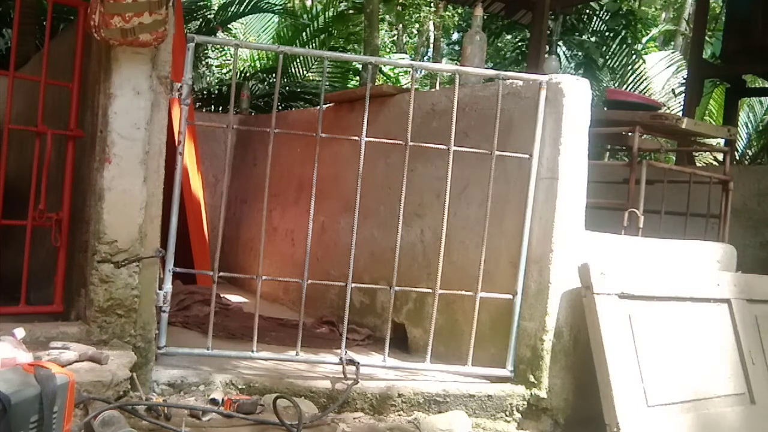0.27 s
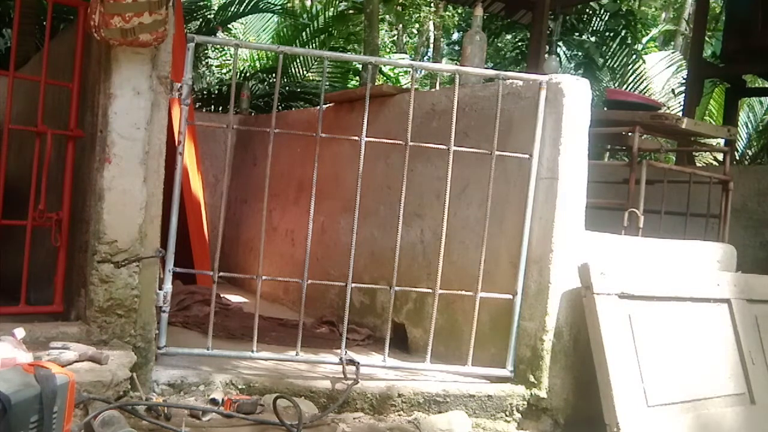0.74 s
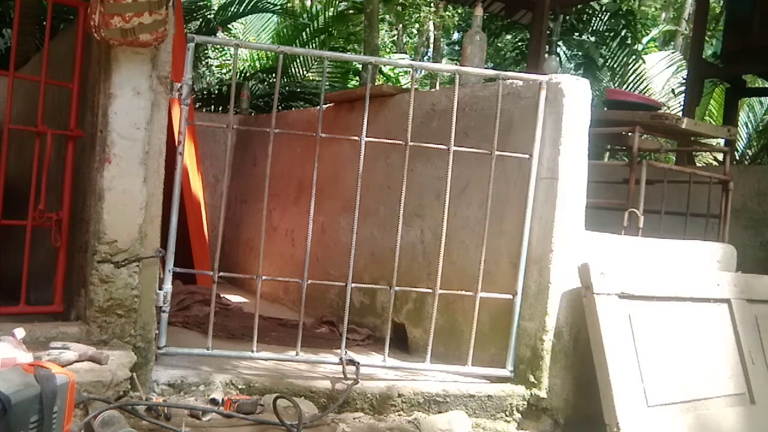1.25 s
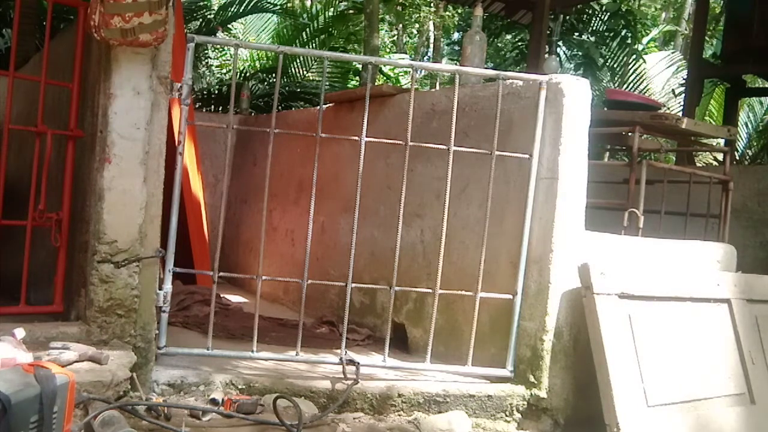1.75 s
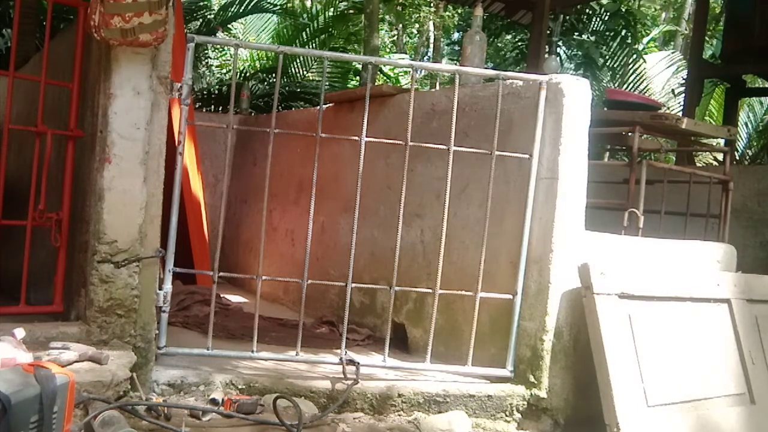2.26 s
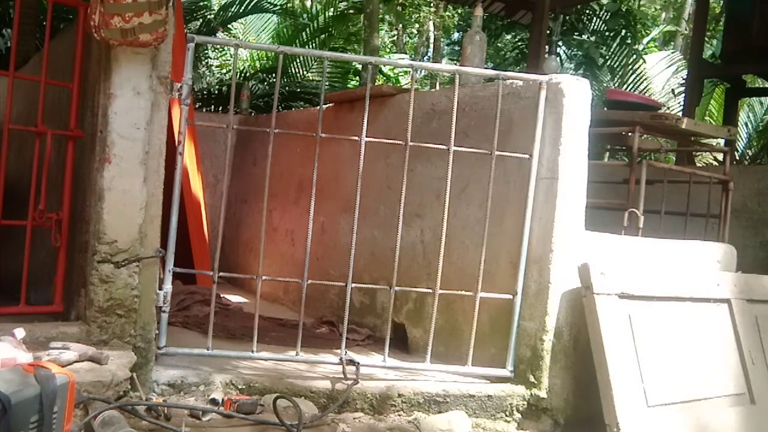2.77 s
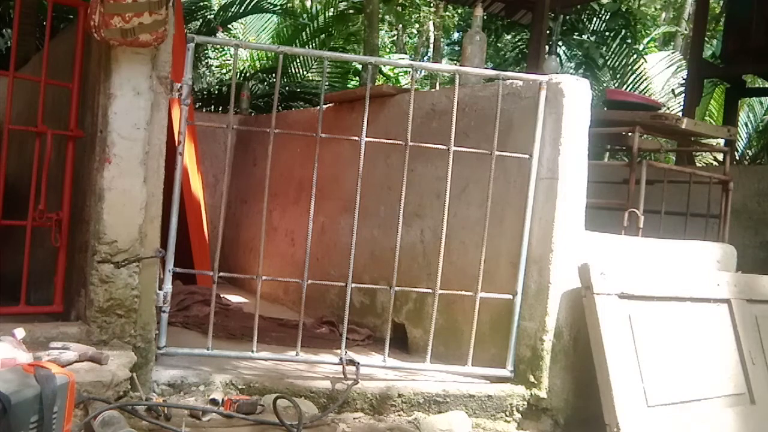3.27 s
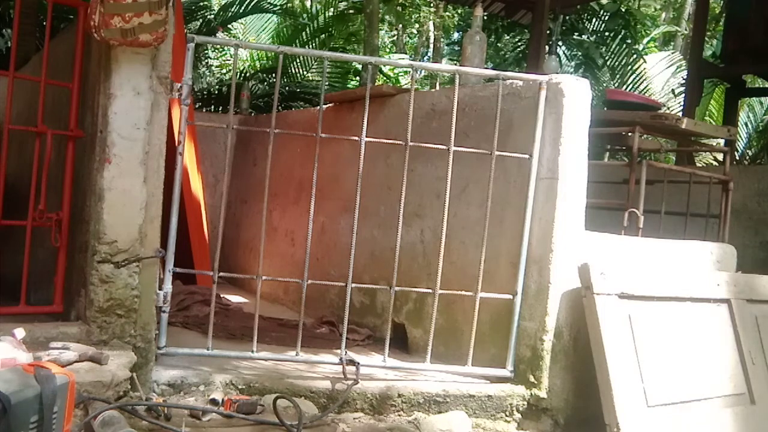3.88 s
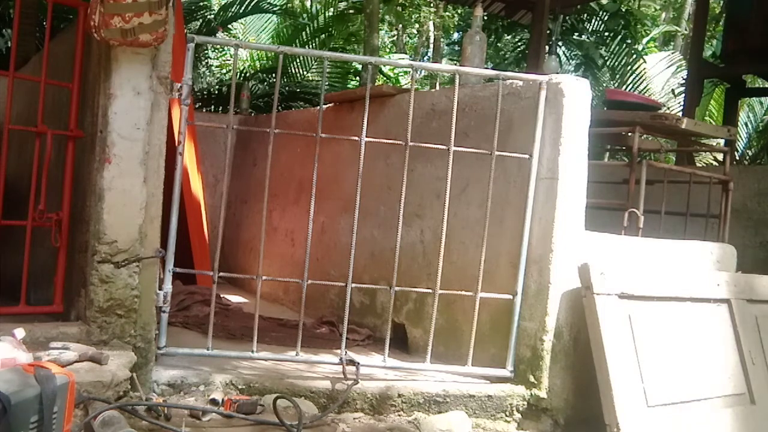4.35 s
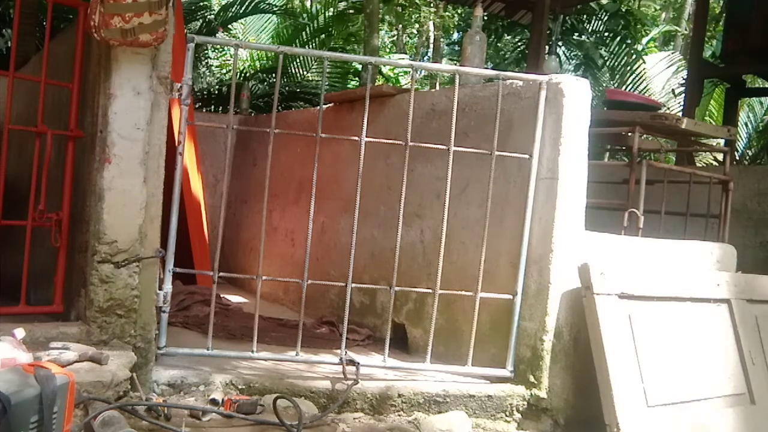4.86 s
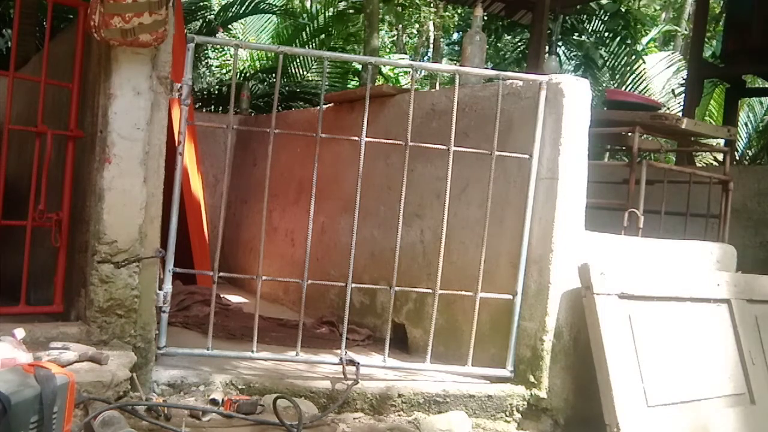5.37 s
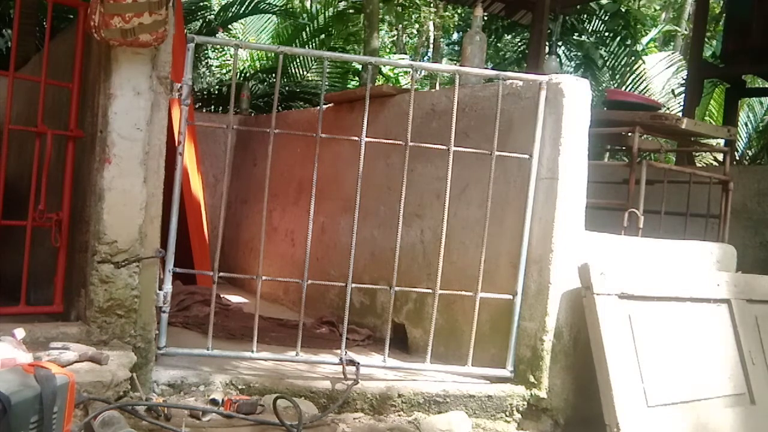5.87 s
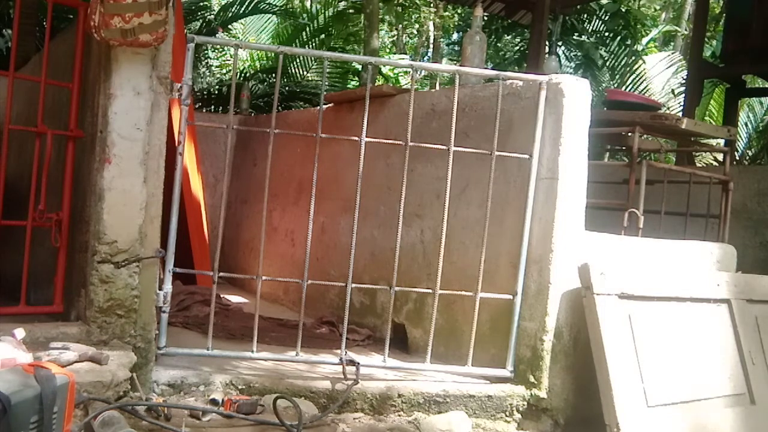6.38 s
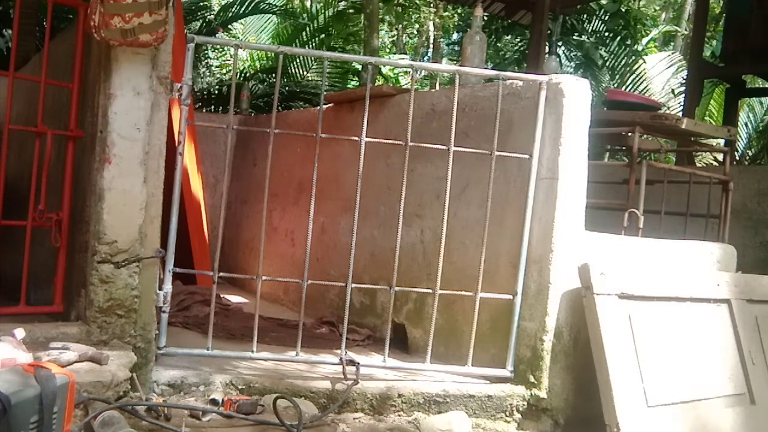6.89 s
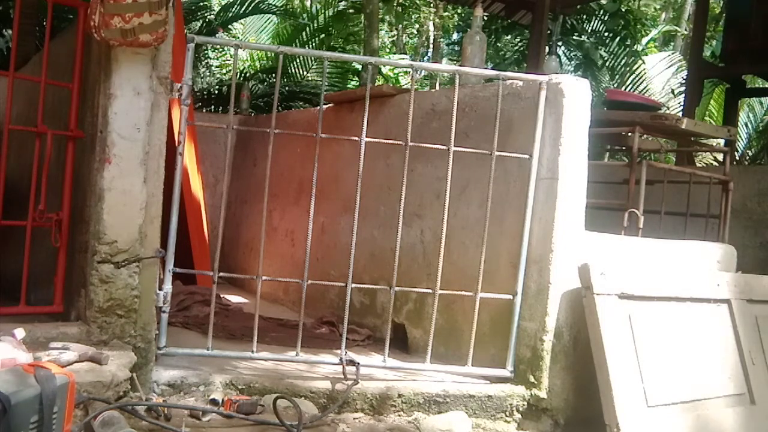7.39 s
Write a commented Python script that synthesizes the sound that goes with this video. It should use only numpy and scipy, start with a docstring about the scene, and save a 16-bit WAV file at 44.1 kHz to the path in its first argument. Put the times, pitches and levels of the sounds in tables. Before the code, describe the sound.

A clear pig squeal gives way to snorting grunts, hoarse barks, low whines and shrill ragged screams ringing off pen walls.

```python
"""Hungry pigs call over one another in an open concrete pen, heard from outside the gate.
A clear squeal opens over the quiet yard, then a second slides down; vocal folds give partials, chaos smears them.
A grunter flaps slack folds and snorts; low whines and hoarse barks of noise join, then shrill harmonic screams.
Rough, wavering squeals follow in the second half, and near the end a bird glides up in one whistle.
The walls add a short ring by convolution throughout; both channels are the same."""
import sys
import numpy as np
from scipy import signal
from scipy.fft import rfft, irfft, next_fast_len
from scipy.io import wavfile
from scipy.ndimage import uniform_filter1d

SR = 44100
rng = np.random.default_rng(int(sys.argv[2]) if len(sys.argv) > 2 else 0)


def unload_audio(sound):
    """Save the sound as a 16-bit wav file, at the path given as the first command line argument."""
    columns = np.transpose(np.atleast_2d(sound))
    # keep every value between -1 and 1, then stretch to whole-number steps
    steps = np.round(np.clip(columns, -1, 1) * 32767)
    wavfile.write(sys.argv[1], SR, steps.astype(np.int16))


N = 336483  # samples

# Levels in the tables are relative: voice trims, the pen and the master gain act on them afterwards.
# quiet air of the yard, with a faint band near 7.6 kHz, probably insects; spectrum: frequency_hz, relative_db
YARD_COLOUR = [(25, -27), (42, -19), (60, 11), (120, 7.5), (250, 2), (600, -6.5), (1500, -18),
               (3500, -16.5), (6000, -10), (6700, -27), (7600, -2), (9000, -20.5), (13000, -44),
               (15200, -18)]
YARD_DB, YARD_WAVER_DB = -59.5, 0.4

# bird whistle: a glide that levels off
BIRD_START_S, BIRD_LENGTH_S, BIRD_RISE_S, BIRD_DB = 7.235, 0.12, 0.071, -30.5
BIRD_FROM_HZ, BIRD_TO_HZ, BIRD_GLIDE_S = 3670, 6700, 0.068

# low whines: start_s, length_s, pitch_hz, fundamental_db (before the throat), overtones_db (over that level)
WHINES = [(0.954, 0.15, 400, -46, -18), (1.301, 0.29, 590.4, -45.5, 0), (2.281, 0.1, 379, -47.5, -21),
          (2.307, 0.062, 644, -41, -5), (2.414, 0.13, 622, -44.5, -2.5), (2.421, 0.14, 342, -65.5, 8),
          (2.614, .14, 371.5, -55, -3), (2.729, .14, 342.3, -59.5, -0.5), (4.203, 0.22, 288.5, -62.5, 4.5),
          (4.419, 0.14, 300.4, -58, 5), (4.799, 0.13, 302.5, -61.5, 10.5), (5.365, 0.17, 303, -53, 3.5),
          (5.523, 0.127, 291, -50.5, -4.5), (5.67, 0.081, 377, -54.5, 2), (5.82, 0.16, 334, -53.5, -2),
          (6.062, 0.11, 287.4, -59.5, 1), (6.43, 0.27, 570, -48.5, 5), (6.929, 0.14, 349.3, -58, 10),
          (7.309, 0.084, 394.5, -47.5, -10)]
# throat colour of a whine: frequency_hz, gain_db
WHINE_THROAT = [(320, 9), (650, -3), (900, 3), (1200, 13.5), (1550, -1), (2100, 0.5), (3200, -3.5),
                (6000, -8.5), (9000, -38)]
WHINE_SAG, WHINE_ARCH = 0.025, 0.0199  # pitch falls and bulges by these shares

# grunts: first_flap_s, rise_s, length_s, chest_db, swell_db (up to the peak),
# mouth_db (over the chest level), flap_rate_hz, belly_db (lift of the lowest chest resonance)
GRUNTS = [(0.365, 0.052, 0.11, -41.5, 2, 8, 32, -1), (0.481, 0.26, 0.27, -33.5, 2, 0, 39, 11),
          (0.997, 0.054, 0.11, -44, -3, -3, 28, 5), (1.697, 0.14, 0.28, -32.5, 10, -2, 27, 6),
          (2.854, 0.16, 0.16, -36.5, 2.5, -12, 33.3, 0), (2.974, 0.042, 0.17, -28, 8, -1.5, 30, 1.5),
          (3.928, 0.12, 0.27, -30, 7, -4.5, 37, 0), (5.063, 0.14, .26, -28.5, 11.5, -1.5, 36, 1.5),
          (6.37, 0.03, 0.15, -34.5, 6, 4, 25.3, 5), (6.724, 0.044, 0.13, -35, -9, -6, 24, -5),
          (7.532, 0.13, .12, -28, 23.5, 0, 34.4, -3)]
# chest resonances of the grunting pig and its corner: frequency_hz, width_hz, gain_db
CHEST_MODES = [(63, 21, 2.5), (141.5, 39, 6), (179, 24, 6.5), (247, 19.7, 12), (386.3, 24, 7.5),
               (549, 98, 5), (647, 42, -17)]
# mouth resonances of the grunting pig: frequency_hz, width_hz, gain_db
MOUTH_MODES = [(979.5, 53, 13.5), (1140, 446, 4), (1494, 480, 0), (2620, 3100, -13), (5200, 3600, -21)]
GRUNT_DROP_DB, GRUNT_RELEASE_S = 5, .035  # fall from peak to end; final linear fade
FLAP_S, FLAP_LEAK, FLAP_UNEVEN_DB = .009, .15, 2.5  # puff decay, steady leak of air, level unevenness
FLAP_SNAP = 4  # height of the snap against the puff

# hard single flaps: start_s, level_db, decay_s, nose_hiss_db (over the level)
SNORTS = [(.512, -29.5, 0.01, -20), (0.605, -26, 0.023, -10), (0.668, -23, 0.011, -10),
          (1.082, -36, 0.012, -24), (1.242, -36, 0.0079, -14), (1.767, -22, 0.0075, -25),
          (2.976, -24, 0.027, -13), (3.919, -30.5, 0.017, -26), (4.034, -27, 0.012, -1)]
# body resonances of a snort: frequency_hz, width_hz, gain_db
SNORT_MODES = [(132, 210, -5), (243, 70, 0.5), (399, 41, 4.5), (546, 54, 3), (1010, 200, -4)]
NOSE_HZ, NOSE_WIDTH_HZ = 2390, 500

# barks that open calls: start_s, rise_s, length_s, level_db, hiss_db (over the level), gape (0-1), opening_s
BARKS = [(0.967, 0.05, 0.11, -32, -5.5, 0.4, 0.06), (1.219, 0.052, 0.074, -28.5, -7.5, 0.18, 0.1),
         (2.177, .11, 0.15, -34.5, 0.5, 0.11, 0.1), (2.937, 0.48, 0.086, -33, 2, 0.48, 0.11),
         (3.945, 0.13, 0.46, -40, 9, 0.22, 0.16), (4.483, 0.017, 0.085, -40, 8.5, 0.06, 0.12),
         (4.671, 0.098, 0.27, -26, -3.5, 1, .125), (6.302, 0.1, 0.16, -27.5, -11.5, 0.85, 0.079),
         (7.284, 0.092, 0.15, -37.5, 2.5, 0.1, 0.06)]
# lower throat resonances of a bark: jaw_shut_hz, jaw_open_hz, width_hz, gain_db
BARK_LOW_MODES = [(509, 1150, 210, 9.5), (1218, 1650, 196, 15.5)]
# upper throat resonances of a bark: jaw_shut_hz, jaw_open_hz, width_hz, gain_db
BARK_HIGH_MODES = [(2823, 3600, 570, 3.5), (3820, 4500, 95, -5.5), (4740, 3000, 340, -2.5),
                   (5780, 5800, 470, 4.5)]
BARK_SWELL_DB, BARK_DROP_DB = 13, 30  # up to the peak, down to the end

# In the loud cries, bite is the band 2-5 kHz over the band below it; edge is the band above 5 kHz.
# clear opening squeal: time_s, pitch_hz, level_db, bite_db
CLEAR_SQUEAL = [(0.0, 461.7, -22, 0), (.07, 506, -22.5, -3), (.115, 518.2, -27, 0), (.16, 517.3, -15, -11),
                (.225, 529.2, -27, 2), (.29, 532.2, -22, -1), (.345, 535.8, -31, 3), (.395, 532.6, -30, 3),
                (.45, 531, -35, -1.5), (.51, 533, -40, -6), (.63, 536, -60, -7)]
# a second pig's squeal, sliding down as the first ends: time_s, pitch_hz, level_db, bite_db
FALLING_SQUEAL = [(.345, 543, -47, 0), (0.389, 523.3, -28.5, -4), (.44, 481, -27.5, -8),
                  (.49, 457, -38, -2)]
# folds lock on the pitch, then break up: lock_s, break_s, locked_roughness (0-1), loose_roughness (0-1),
# edge_db (over the bite)
CLEAR_LOCK = (.12, .37, .035, .3, -19)
# throat colour of the clear squeals: frequency_hz, gain_db
CLEAR_THROAT = [(300, -20), (480, -2), (560, -11.5), (1040, 15.5), (1600, 2.5), (1950, -6.5), (2150, -11.5),
                (2650, -28.5), (3180, -10), (3750, -16), (4200, -29), (4800, -29), (5300, -24.5),
                (5800, -24), (7400, -22), (9000, -43.5), (11500, -49), (14000, -59)]

# short squeals: start_s, length_s, first_pitch_hz, last_pitch_hz, level_db, swell_db, bite_db,
# edge_db (over the level), brightening_db (along the call), mouth_hz, settled_roughness (0-1)
SHORT_SQUEALS = [ (4.446, 0.11, 617, 579.5, -39.5, 12, 7, 9, -12, 2500, 0.44),
                 (4.736, .2, 606, 605.4, -29.5, -7, 10, 13.5, -15, 3300, 0.49),
                 (5.142, .22, 565, 694, -37, 7, 3, -2.5, -2, 3550, 0.74), ]
# long wavering squeals, one list each: time_s, pitch_hz, level_db, bite_db
LONG_SQUEALS = [
    [(4.01, 696, -47, 5), (4.055, 714, -47, 14.5), (4.14, 755, -41, 7), (4.26, 755, -43, 1),
     (4.31, 704, -43.5, -5), (4.38, 701, -44, -12), (4.47, 711, -53.5, 17), (4.52, 686, -44, -6),
     (4.57, 690, -48, -9)],
    [(5.34, 687, -41, 1), (5.39, 768, -41.5, 8), (5.54, 693, -44.5, 9.5), (5.63, 710.4, -33.5, 0),
     (5.708, 646.4, -28, -3), (5.77, 681.7, -37.5, 1), (5.85, 679.6, -28, -1.5), (5.964, 713, -26.5, -9),
     (6.015, 698, -37.5, -2.5), (6.04, 720, -57, 4)],
]
# folds of each long squeal: lock_s, break_s, locked_roughness (0-1), loose_roughness (0-1)
LONG_LOCKS = [(4.14, 4.49, .26, .7), (5.39, 6.0, .42, .75)]
# mouth of each long squeal: edge_db (over the bite), resonance_hz, width_hz, gain_db
LONG_MOUTHS = [(3.5, 3130, 450, 5), (-1.5, 4430, 320, -2)]
# throat colour of the short and long squeals: frequency_hz, gain_db
SQUEAL_THROAT = [(250, -15.5), (450, 15.5), (720, -35), (950, 8.5), (1200, 18), (1420, 16), (1650, 6.5),
                 (2050, -2.5), (2600, -8), (3300, -6), (3900, -14), (4600, -1.5), (5400, -11), (6300, -5),
                 (7700, -8), (9000, -19), (11500, -35), (15000, -36)]
SQUEAL_ATTACK_S, SQUEAL_RELEASE_S, SQUEAL_FOOT_DB = 0.048, 0.037, -13  # rises from and falls to this foot
SQUEAL_ARCH, SETTLE_S = .02, 0.0734  # pitch bulges by this share; the opening chaos dies away

# screams in the top register, one list each: time_s, pitch_hz, level_db, bite_db
SCREAMS = [
    [(1.255, 1293, -28, -14), (1.295, 1289, -21, -22.5), (1.32, 1275, -32, -11), (1.36, 1251, -27, -13),
     (1.424, 1415, -41.5, -7), (1.494, 1548, -37, 4.5), (1.576, 1339, -27, -1), (1.68, 1184, -37.5, -3.5),
     (1.794, 1490, -54.5, 15), (1.86, 1444, -27, -14.5)],
    [(2.24, 1029, -40.5, 8.5), (2.3, 1112, -31.5, 12.5), (2.345, 1112, -39.5, 14), (2.394, 1070, -49.5, 13),
     (2.478, 1139, -47, 20), (2.55, 1056, -42.5, 12.5), (2.69, 1021, -42.5, 6), (2.76, 1037, -68, 1)],
    [(2.99, 1127, -39.5, 1), (3.06, 1398, -40.5, 14.5), (3.115, 1266, -45, 10), (3.19, 1319, -40, 10),
     (3.23, 1245, -36, 5), (3.295, 1375, -33.5, 7.5), (3.335, 1244, -32.5, 6.5), (3.38, 1227, -26, -0.5),
     (3.45, 1264, -21.5, -2), (3.51, 1179, -25, -7.5), (3.555, 1178, -31.5, -0.5), (3.6, 1317, -34, 3.5),
     (3.64, 1278, -46.5, 7)],
    [(5.35, 1052, -52, 4), (5.41, 1026, -51, 14), (5.5, 970, -48.5, 18), (5.59, 1036, -50.5, 15.5),
     (5.7, 938, -47, 11.5), (5.84, 906, -46, 10.5), (5.94, 1013, -50.5, 17), (6.02, 982, -43.5, 13.5)],
    [(6.34, 1282, -47.5, 14), (6.385, 1390, -26.5, -0.5), (6.426, 1450, -32, 1.5), (6.462, 1615, -36, 4.5),
     (6.524, 1326, -33, -1.5), (6.62, 1307, -24, -5.5), (6.665, 1228, -23.5, -9), (6.73, 1218, -24, -7),
     (6.8, 1263, -22.5, -10), (6.92, 1253, -20, -9.5), (7.014, 1180, -20, -7), (7.055, 1130, -32.5, -5)],
    [(7.35, 967, -53, 2), (7.385, 1021, -28, 1), (7.43, 1146, -37, 8.5), (7.47, 1294, -29.5, 0),
     (7.55, 1263, -31.5, -1), (7.63, 1307, -25.5, -6.5)],
]
# folds of each scream: lock_s, break_s, locked_roughness (0-1), loose_roughness (0-1), period_doubling_db
SCREAM_LOCKS = [(1.47, 1.72, .34, .56, -7), (2.32, 2.55, .43, .78, -6), (3.34, 3.56, .36, .56, -12),
                (5.38, 6.0, .42, .7, -9), (6.51, 7.03, .31, .68, -11), (7.44, 7.7, .38, .62, -8)]
# mouth of each scream: edge_db (over the bite), resonance_hz, width_hz, gain_db
SCREAM_MOUTHS = [(-4.5, 2600, 350, -7), (-4.5, 3470, 450, 2), (-3.5, 2800, 330, 4.5), (-2.5, 3060, 450, 6),
                 (0, 4470, 550, -4), (0.5, 3900, 890, 1)]
# throat colour of a scream: frequency_hz, gain_db
SCREAM_THROAT = [(250, -14), (600, -4.5), (900, 4.5), (1280, 9.5), (1600, -0.5), (1950, -1.5),
                 (2300, -17.5), (2650, -13.5), (3800, -13), (4400, -13), (5000, -13), (6400, -7.5),
                 (7700, -8), (9000, -20.5), (11500, -37.5), (15000, -42.5)]

LOCK_S = .015  # time scale on which folds lock or break up
SMEAR_WIDENS_HZ = 4500  # above this, smeared partials grow wider
OPENING_S, OPENING_DB = 0.037, -14  # the treble of a cry comes in late, as the mouth opens
CUTOFF_HZ = 15550  # top of the partials and of the finished sound


def from_db(db):
    """Decibel law: a level becomes an amplitude gain."""
    return 10 ** (np.asarray(db) / 20)


def rms_one(x):
    """Normalisation: scale a signal to unit mean power."""
    return x / np.sqrt(np.mean(x ** 2) + 1e-20)


def gain_at(points, hz):
    """Spectral envelope: interpolate a colour in decibels over log frequency."""
    f, db = np.transpose(points)
    return from_db(np.interp(np.log(hz + 1), np.log(f), db))


def filtered(x, response):
    """Linear filtering: multiply the spectrum by a gain given as a function of frequency."""
    size = next_fast_len(len(x) + 2048)
    hz = np.arange(size // 2 + 1) * SR / size
    return irfft(rfft(x, size) * response(hz), size)[:len(x)]


def noise(size, colour):
    """Coloured noise: white noise through a spectral envelope, at unit power."""
    return rms_one(filtered(rng.standard_normal(size), lambda hz: gain_at(colour, hz)))


def drift(size, rate_hz):
    """Random modulation: low-passed noise wavering up to about the given rate, with unit power."""
    return rms_one(filtered(rng.standard_normal(size), lambda hz: 1 / (1 + (hz / rate_hz) ** 2)))


def evened(x, window=0.012):
    """Envelope flattening: hold the power over a window in seconds at 1."""
    power = np.abs(uniform_filter1d(x * x, int(window * SR)))
    return x / np.sqrt(power + 1e-12)


def resonate(x, modes):
    """Modal resonance: parallel two-pole resonators of alternating sign."""
    out = 0
    for k, (hz, width, db) in enumerate(modes):
        r = np.exp(-np.pi * width / SR)
        poles = [1, -2 * r * np.cos(2 * np.pi * hz / SR), r * r]
        ringing = signal.lfilter([1, 0, -1], poles, x)
        out = out + (-1) ** k * from_db(db) * (1 - r * r) / 2 * ringing
    return out


def hoarse(phase, width_hz):
    """Narrow-band noise: two random quadratures on a carrier phase, at unit power."""
    def spread():
        white = rng.standard_normal(len(phase))
        return filtered(white, lambda hz: 1 / np.sqrt(1 + (2 * hz / width_hz) ** 4))
    return rms_one(spread() * np.cos(phase) + spread() * np.sin(phase))


def span(start, length):
    """Time base: sample times of a call, and its progress from 0 to 1."""
    t = np.arange(int(start * SR), min(int((start + length) * SR), N)) / SR
    return t, (t - start) / length


def hump(t, rise_s, swell_db, drop_db):
    """Breath pressure: one push raises the level in dB to a rounded peak at 0, then it falls."""
    age = t - t[0]
    rise = np.maximum(1 - age / rise_s, 0)
    fall = np.maximum(age - rise_s, 0) / max(age[-1] - rise_s, .02)
    return -swell_db * rise ** 2 - drop_db * fall ** 2


def add(out, t, sound, fade_s=.008):
    """Superposition: lay a call into the track with linearly faded ends."""
    at = round(t[0] * SR)
    to_nearest_end = np.minimum(t - t[0], t[-1] - t)
    out[at:at + len(t)] += sound * np.minimum(1, to_nearest_end / fade_s)


def fold_phase(pitch, jitter, jitter_hz, waver):
    """Frequency modulation: phase of an oscillator whose pitch trembles quickly and wavers slowly."""
    size = len(pitch)
    trembling = jitter * drift(size, jitter_hz) + waver * drift(size, 25.46)
    return 2 * np.pi * np.cumsum(pitch * (1 + trembling)) / SR


def partials(phase, pitch, multiples, throat, chaos, smear_hz, flutter_db=4.5):
    """Source and filter: throat-weighted partials, smeared into bands by chaos, the high ones most."""
    out = 0
    for k in multiples[multiples * pitch.mean() < CUTOFF_HZ]:
        hz = k * pitch
        smeared = chaos * (hz / 3000) ** 1.3
        line = np.sqrt(2) * np.sin(k * phase + rng.uniform(0, 2 * np.pi))
        band = hoarse(k * phase, smear_hz * max(1, hz.mean() / SMEAR_WIDENS_HZ))
        # each partial swells and fades on its own, low ones less
        swell = from_db(flutter_db * np.minimum(hz / 1500, 1) * drift(len(phase), 15.0))
        out = out + swell * gain_at(throat, hz) * (line + smeared * band) / np.sqrt(1 + smeared ** 2)
    return out


def quiet_yard():
    """Ambient noise: a steady coloured hush, probably with insects, whose level wavers slightly."""
    level_db = YARD_DB + YARD_WAVER_DB * drift(N, 5.1)
    return from_db(level_db) * noise(N, YARD_COLOUR)


def pen(x, early_db=-8, early_t60=0.2, tail_db=-14, tail_t60=0.67):
    """Reverberation: direct sound, a dense short ring between walls and a longer tail from under the roof."""
    t = np.arange(int(.8 * SR)) / SR
    early_colour = [(100, 1.5), (1200, 0.0), (3000, -0.5), (15000, -11)]
    tail_colour = [(100, -7.5), (600, -11.5), (1300, -10.0), (6000, -6.0), (12000, -16.5)]
    early = noise(len(t), early_colour) * from_db(-60 * t / early_t60)
    tail = noise(len(t), tail_colour) * from_db(-60 * t / tail_t60)
    early = from_db(early_db) * rms_one(early * (t > .004))
    tail = from_db(tail_db) * rms_one(tail * (t > .02))
    response = (early + tail) / np.sqrt(len(t))
    response[0] = 1  # direct sound
    return signal.fftconvolve(x, response)[:N]


def bird(swell_db=22, drop_db=2):
    """Frequency glide: one thin whistle from the trees rises exponentially towards its last pitch."""
    out = np.zeros(N)
    t, _ = span(BIRD_START_S, BIRD_LENGTH_S)
    pitch = BIRD_TO_HZ + (BIRD_FROM_HZ - BIRD_TO_HZ) * np.exp((t[0] - t) / BIRD_GLIDE_S)
    whistle = np.sin(fold_phase(pitch, jitter=0.013, jitter_hz=310, waver=0.0035))
    add(out, t, from_db(BIRD_DB + hump(t, BIRD_RISE_S, swell_db, drop_db)) * whistle)
    return out


def whiner(whine_db=-1):
    """Harmonic voice: quieter pigs give short low nasal notes, each arched and sagging in pitch."""
    out = np.zeros(N)
    for start, length, hz, level_db, overtones_db in WHINES:
        t, along = span(start, length)
        pitch = hz * (1 + WHINE_SAG * (.5 - along) + WHINE_ARCH * (np.sin(np.pi * along) - .5))
        phase = fold_phase(pitch, jitter=0.0102, jitter_hz=100, waver=0.016)
        voice = dict(throat=WHINE_THROAT, chaos=.4, smear_hz=130, flutter_db=2)
        root = partials(phase, pitch, np.arange(1, 2), **voice)
        overtones = partials(phase, pitch, np.arange(2, 16), **voice)
        whine = root + from_db(overtones_db) * overtones
        add(out, t, from_db(level_db + whine_db) * whine, fade_s=0.0096)
    return out


def grunter(chest_db=-1, mouth_db=-2):
    """Pulse excitation: slack folds flap slowly, each flap a snap and a puff into chest and mouth."""
    out = np.zeros(N)
    chest_band = signal.butter(3, [52, 950], "band", fs=SR, output="sos")
    mouth_lowpass = signal.butter(2, 6500, fs=SR, output="sos")
    for first, rise_s, length, peak_db, swell_db, open_db, rate, belly_db in GRUNTS:
        t, _ = span(first, length)
        level_db = peak_db + hump(t, rise_s, swell_db, GRUNT_DROP_DB) + FLAP_UNEVEN_DB * drift(len(t), 30)
        # time since the last flap, with slightly uneven timing
        since = (t - first + .0007 * drift(len(t), 10.0)) % (1 / rate)
        snaps = np.diff(since, prepend=since[0]) < 0
        puffs = (np.exp(-since / FLAP_S) + FLAP_LEAK) * rng.standard_normal(len(t))
        flow = FLAP_SNAP * snaps + puffs
        belly = (from_db(belly_db) - 1) * resonate(flow, CHEST_MODES[:1])
        chest = evened(resonate(flow, CHEST_MODES) + belly, window=2 / rate)
        chest = signal.sosfilt(chest_band, chest)
        mouth = signal.sosfilt(mouth_lowpass, resonate(flow, MOUTH_MODES))
        mouth = evened(mouth, window=2 / rate) * from_db(open_db + mouth_db)
        release = np.minimum((t[-1] - t) / GRUNT_RELEASE_S, 1)
        add(out, t, release * from_db(level_db) * (from_db(chest_db) * chest + mouth))
    return out


def snorts(snort_db=0, attack_s=0.0011):
    """Decaying turbulence: a hard flap sends one puff through chest and snout, with a hiss in the nose."""
    out = np.zeros(N)
    lowpass = signal.butter(3, 1300, fs=SR, output="sos")
    for start, level_db, decay_s, nose_db in SNORTS:
        t, _ = span(start, .12)
        lead_in = 2000  # samples for the resonances to build up, then discarded
        body = evened(resonate(rng.standard_normal(len(t) + lead_in), SNORT_MODES))[lead_in:]
        body = signal.sosfilt(lowpass, body)
        nose = from_db(nose_db) * hoarse(2 * np.pi * NOSE_HZ * t, NOSE_WIDTH_HZ)
        decay = np.exp((t[0] - t) / decay_s)
        add(out, t, from_db(level_db + snort_db) * decay * (body + nose), fade_s=attack_s)
    return out


def bark_throat(modes, jaw):
    """Moving formants: noise bands glide from their shut to their open frequencies with the jaw."""
    bands = 0
    for shut_hz, open_hz, width, db in modes:
        phase = 2 * np.pi * np.cumsum(shut_hz + jaw * (open_hz - shut_hz)) / SR
        bands = bands + from_db(db) * hoarse(phase, width)
    return evened(bands)


def barks(bark_db=-0.5, hiss_db=-3, rattle_db=2):
    """Aperiodic excitation: folds not yet locked on a pitch rattle into the gliding throat resonances."""
    out = np.zeros(N)
    for start, rise_s, length, peak_db, high_db, gape, opening_s in BARKS:
        t, _ = span(start, length)
        level_db = peak_db + hump(t, rise_s, BARK_SWELL_DB, BARK_DROP_DB)
        jaw = gape * np.minimum((t - t[0]) / opening_s, 1) ** 2
        bark = bark_throat(BARK_LOW_MODES, jaw)
        bark = bark + from_db(high_db + hiss_db) * bark_throat(BARK_HIGH_MODES, jaw)
        rattle = rattle_db * drift(len(t), 200)
        add(out, t, bark * from_db(level_db + bark_db + rattle), fade_s=0.012)
    return out


def controls(rows):
    """Interpolation: sample times of a call, then each of its columns at those times."""
    s, *columns = np.transpose(rows)
    t = np.arange(max(int(s[0] * SR), 0), min(int(s[-1] * SR), N)) / SR
    return [t] + [np.interp(t, s, c) for c in columns]


def locking(t, lock_s, break_s, locked, loose):
    """Mode locking: roughness is loose at first, cleaner while the folds are locked, loose again after."""
    locks = 1 + np.tanh((t - lock_s) / LOCK_S)
    not_broken = 1 + np.tanh((break_s - t) / LOCK_S)
    held = locks * not_broken / 4
    return np.clip(loose + held * (locked - loose), 0, 1)


def long_call(curve, lock_s, break_s, locked, loose, edge_db, rough_edge_db=0):
    """Vocal gesture of a long cry: the edge follows the bite and can sharpen with roughness."""
    t, pitch, level_db, bite_db = controls(curve)
    rough = locking(t, lock_s, break_s, locked, loose)
    edge_db = bite_db + edge_db + rough_edge_db * (rough - locked)
    return t, pitch, level_db, bite_db, edge_db, rough


def short_call(start, length, first_hz, last_hz, level_db, swell_db, bite_db, edge_db, brighten_db, settled):
    """Vocal gesture of a short squeal: arched glide; attack, sloping hold, release; chaos that settles."""
    t, along = span(start, length)
    pitch = (first_hz + (last_hz - first_hz) * along) * (1 + SQUEAL_ARCH * np.sin(np.pi * along))
    attack = np.maximum(1 - (t - start) / SQUEAL_ATTACK_S, 0)
    release = np.maximum(1 - (t[-1] - t) / SQUEAL_RELEASE_S, 0)
    level_db = level_db + swell_db * along + SQUEAL_FOOT_DB * (attack + release)
    rough = np.clip(settled + (1 - settled) * np.exp((start - t) / SETTLE_S), 0, 1)
    brightening = brighten_db * along
    return t, pitch, level_db, bite_db + brightening, edge_db + brightening, rough


def torn_air(size, throat, tear_db, tear_hz):
    """Turbulence: rasping bands of noise flare and drop out, each on its own; unit power."""
    turn = 2 * np.pi * np.arange(size) / SR
    bands = 0
    for hz in np.arange(400, 9000, 550):
        flare = from_db(tear_db * drift(size, tear_hz))
        bands = bands + gain_at(throat, hz) * flare * hoarse(hz * turn, 550)
    return rms_one(rms_one(bands) + noise(size, throat) / 2)


def cry(gesture, throat, jitter, waver, chaos, smear_hz, half_db, rasp_db, treble_rasp_db, shake_db, mouth=()):
    """Nonlinear phonation: roughness brings jitter, period doubling, shaking and rasping air."""
    t, pitch, level_db, bite_db, edge_db, rough = gesture
    phase = fold_phase(pitch, jitter * rough, 135.0, waver * rough)
    multiples = np.arange(1, 27)
    tone = partials(phase, pitch, multiples, throat, chaos * rough, smear_hz)
    doubling = partials(phase, pitch, multiples - .5, throat, chaos * rough, smear_hz)
    # air is let through once a cycle; its tilt above 2600 Hz sets the treble rasp
    air = torn_air(len(t), throat, tear_db=4.5, tear_hz=60) * (1 + .4 * np.cos(phase))
    air_colour = [(2600, rasp_db), (6500, rasp_db + treble_rasp_db)]
    air = filtered(air, lambda hz: gain_at(air_colour, hz))
    voice = rms_one(tone + rough * from_db(half_db) * doubling) + rough ** 1.5 * air
    voice = voice + resonate(voice, mouth)

    def below(corner_hz):
        return filtered(voice, lambda hz: 1 / (1 + (hz / corner_hz) ** 12))

    # strain shifts the power between the low, middle and high throat resonances
    low, up_to_middle = below(2000), below(5000)
    middle, high = up_to_middle - low, voice - up_to_middle
    shut_db = OPENING_DB * np.exp((t[0] - t) / OPENING_S)
    call = evened(low)
    call = call + from_db(bite_db + shut_db / 2) * evened(middle)
    call = call + from_db(edge_db + shut_db) * evened(high)
    return call * from_db(level_db + shake_db * rough * drift(len(t), 27))


def clear_squeals(clear_db=-1):
    """Phase-locked folds: nearly pure harmonic squeals, the edge sharpening where the lock is loose."""
    out = np.zeros(N)
    for curve in (CLEAR_SQUEAL, FALLING_SQUEAL):
        call = long_call(curve, *CLEAR_LOCK, rough_edge_db=30)
        squeal = cry(call, CLEAR_THROAT, jitter=.02, waver=.012, chaos=1, smear_hz=200,
                     half_db=-13, rasp_db=-1, treble_rasp_db=5, shake_db=5)
        add(out, call[0], from_db(clear_db) * squeal)
    return out


def rough_squeals(squeal_db=0, long_db=0, mouth_db=1, mouth_width_hz=450):
    """Period doubling: strong half-order partials roughen the short and the long wavering squeals."""
    out = np.zeros(N)
    calls = []
    for *row, mouth_hz, settled in SHORT_SQUEALS:
        calls.append((short_call(*row, settled), (mouth_hz, mouth_width_hz, mouth_db), squeal_db))
    for curve, lock, (edge_db, *mouth) in zip(LONG_SQUEALS, LONG_LOCKS, LONG_MOUTHS):
        calls.append((long_call(curve, *lock, edge_db), mouth, long_db))
    for call, mouth, db in calls:
        squeal = cry(call, SQUEAL_THROAT, jitter=.01, waver=.032, chaos=.9, smear_hz=150,
                     half_db=-2, rasp_db=-6.5, treble_rasp_db=8, shake_db=2.5, mouth=[mouth])
        add(out, call[0], from_db(db) * squeal, fade_s=0.0084)
    return out


def screams(scream_db=0):
    """Chaotic phonation: high-pitched cries whose upper partials smear strongly into noise."""
    out = np.zeros(N)
    for curve, (*lock, half_db), (edge_db, *mouth) in zip(SCREAMS, SCREAM_LOCKS, SCREAM_MOUTHS):
        call = long_call(curve, *lock, edge_db)
        scream = cry(call, SCREAM_THROAT, jitter=.022, waver=.026, chaos=1.6, smear_hz=220,
                     half_db=half_db, rasp_db=-7.5, treble_rasp_db=9.5, shake_db=2.2, mouth=[mouth])
        add(out, call[0], from_db(scream_db) * scream, fade_s=0.011)
    return out


def scene():
    """Superposition: all the animals through the pen, over the quiet yard; the same in both channels."""
    yard = quiet_yard()
    pigs = whiner() + grunter() + snorts() + barks() + clear_squeals() + rough_squeals() + screams()
    mono = from_db(-3.5) * pen(bird() + pigs) + yard
    return np.array([mono, mono])


def record(dry):
    """Band limiting: the microphone drops the deepest bass; the top is cut steeply."""
    dry = signal.sosfilt(signal.butter(4, 45, "high", fs=SR, output="sos"), dry)
    return signal.sosfilt(signal.ellip(10, .1, 90, CUTOFF_HZ, fs=SR, output="sos"), dry)


dry = scene()
out = record(dry)
unload_audio(out)
```